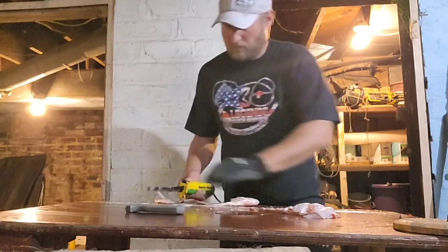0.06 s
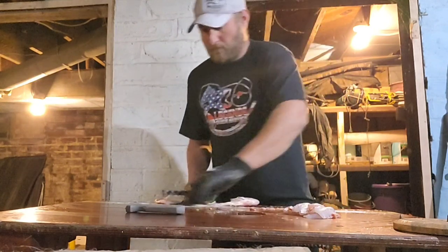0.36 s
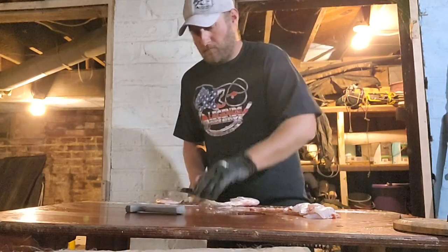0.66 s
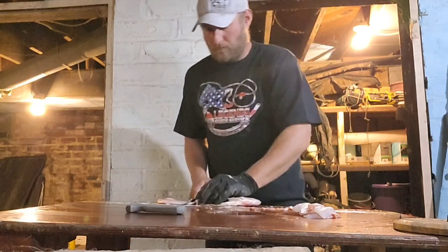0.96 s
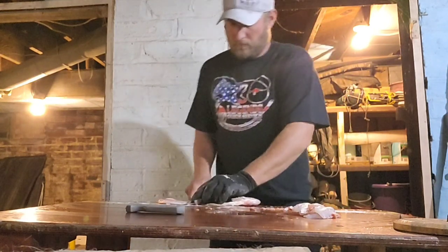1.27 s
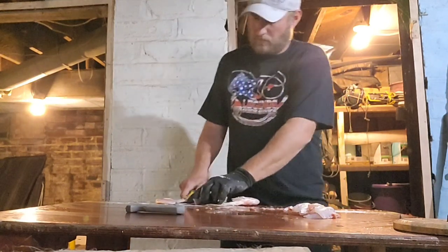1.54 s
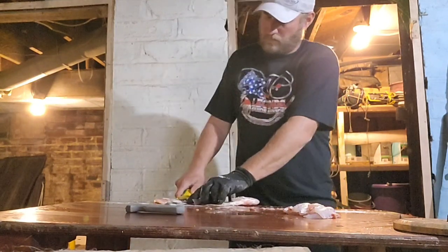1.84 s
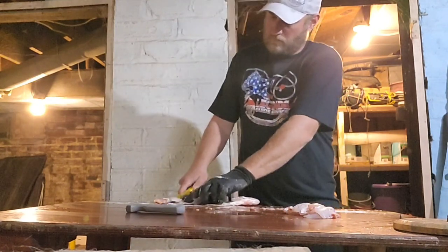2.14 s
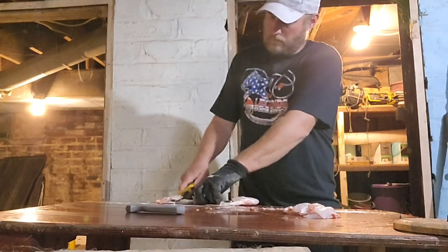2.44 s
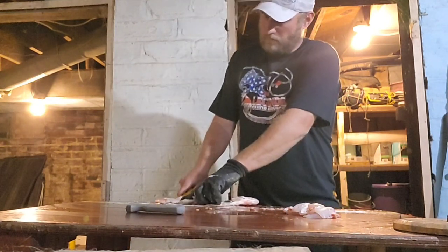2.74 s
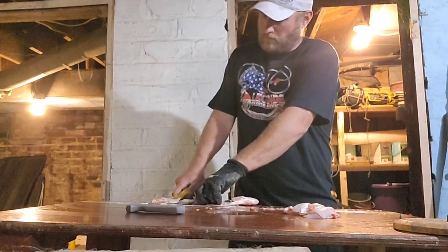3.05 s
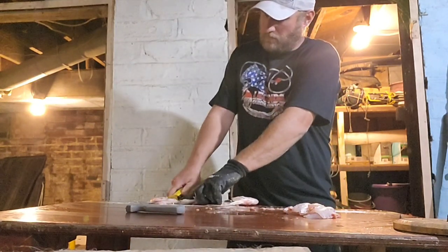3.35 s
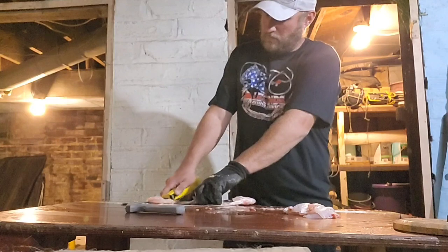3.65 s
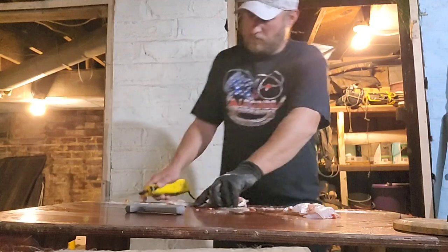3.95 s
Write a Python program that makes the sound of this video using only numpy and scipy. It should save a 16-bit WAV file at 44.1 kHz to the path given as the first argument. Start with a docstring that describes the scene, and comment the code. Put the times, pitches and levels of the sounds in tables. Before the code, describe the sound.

An electric knife winds down, clicks back on and buzzes as it cuts fish.

```python
"""An electric fillet knife coasts almost to a stop, with a few knocks, at a wooden table in a cellar.
After one second the trigger clicks, the geared motor whines up, and two blades saw through a fish.
As they slide to and fro the housing shakes, the blades clatter and ring, and brushes and fan hiss.
Near 2.7 s the motor nearly stalls in a tough spot, then recovers and cuts on.
All along, the brick walls add a short echo."""
import sys
import numpy as np
from scipy import signal
from scipy.fft import rfft, irfft
from scipy.io import wavfile
from scipy.ndimage import uniform_filter1d

SR = 44100
rng = np.random.default_rng(int(sys.argv[2]) if len(sys.argv) > 2 else 0)


def store_wav(level_fs):
    """Save 16-bit WAV to argv[1]."""
    pcm = np.round(np.clip(np.atleast_2d(level_fs), -1, 1) * 32767)
    wavfile.write(sys.argv[1], SR, pcm.T.astype(np.int16))


N = 176400  # 4 seconds

# How fast the motor drives the blades: time_s, strokes_per_s
SPEED = [(0, 17), (.3, 9), (.65, 1), (1.0, 1), (1.1, 10.5), (1.2, 15.6), (1.3, 19.8), (1.4, 21.8),
         (1.5, 23.1), (1.6, 23.75), (1.7, 23.87), (1.85, 23.5), (2.0, 23.07), (2.19, 22.7), (2.35, 24.05),
         (2.5, 20.1), (2.6, 17.9), (2.72, 13.7), (2.8, 18.5), (2.9, 20.6), (3.05, 21.9), (3.15, 22.2),
         (3.35, 22.03), (3.6, 22.3), (3.8, 22.9), (4, 24.6)]
# Loudness while coasting and starting: time_s, shake_db, clatter_db, motor_db
COASTING_LEVELS = [(0, -67, -41.5, -40), (.12, -54, -48, -43), (.27, -76, -59, -47.5),
                   (.42, -73, -61, -54.5), (.62, -75, -61.5, -60.5), (.68, -91, -77, -76),
                   (.76, -93, -93, -86), (.99, -92, -75, -68.5), (1.04, -70, -60, -60)]
# Loudness while cutting: time_s, shake_db, clatter_db, motor_db
CUTTING_LEVELS = [(1.08, -77.5, -38.5, -48.5), (1.17, -55, -38, -43.5), (1.28, -33.5, -33.5, -41),
                  (1.5, -28.5, -32.5, -37), (1.55, -26.5, -33, -37), (1.9, -32, -33.5, -37),
                  (2.23, -31.5, -35.5, -37), (2.33, -42, -33.5, -36), (2.45, -37.5, -35, -36.5),
                  (2.71, -57.5, -40.5, -43.5), (2.75, -53.5, -35.5, -41), (2.96, -31.5, -35.5, -37.5),
                  (3.86, -32, -34, -36.5), (4.0, -39.5, -34.5, -33.5)]
# How strongly the motor whines at each pitch: pitch_hz, level_db
WHINE_COLOUR = [(800, -38), (2020, -15), (2110, -8), (2220, -10), (2300, -3), (3000, -19), (4200, -11.5),
                (4400, -8.5), (5400, -10), (6400, -15), (7600, -24), (9600, -25), (10600, -14),
                (11400, -20), (12700, -23), (13700, -18.5), (14600, -28)]
# Loudness of the gears' thin ring: time_s, level_db
GEAR_LEVELS = [(1.3, -57), (1.48, -40), (1.88, -41), (2.1, -52), (2.33, -44), (2.5, -59), (4.0, -43.5)]
# The narrow band where the gears ring: pitch_hz, level_db
GEAR_COLOUR = [(2150, -50), (2375, 0), (2435, 0), (2620, -50)]

# How strongly the housing shakes at each pitch: pitch_hz, level_db
SHAKE_COLOUR = [(45, -40), (68, -18.5), (88, -29.5), (94, -16.5), (110, -28.5), (120, -21.5), (165, -58),
                (208, -32), (228, -19), (262, -6), (300, -12), (335, -13.5), (385, -5.5), (430, -12.5),
                (467, -9.5), (510, -20), (620, -16.5), (900, -45)]
# Boost or cut of the housing's deep boom: time_s, gain_db
BOOM_GAINS = [(1.3, -0.5), (1.6, -9.5), (1.8, 9), (2.0, 6), (2.27, 8.5), (2.5, -1.5), (3.1, 1.5),
              (3.8, 0.5)]
# The two points where the blades turn back: place_in_stroke (0 to 1), level_db
REVERSALS = [(.36, 0), (.73, -1.5)]
# Looseness of the blades: time_s, spread_cycles; then how fast they wander
SLACK, SLACK_HZ = [(1.3, .09), (2.3, .12), (3.0, .03)], 4

# Broad tone of the clatter: pitch_hz, level_db
CLATTER_COLOUR = [(60, -56.5), (160, -32.5), (260, -12.5), (500, -7.5), (1000, -9), (1500, -17.5),
                  (2400, -13.5), (3000, -19), (6000, -29.5), (9500, -30), (16000, -42)]
# Notes that blades and housing favour: pitch_hz, half_width_hz, level_db
CLATTER_PEAKS = [(200.2, 19.6, -7.5), (480, 27, -4.5), (622, 96, -4), (747, 29, 0), (1286, 324, -7.5),
                 (1965, 124, -7), (2410, 180, -7), (3740, 180, -16), (4360, 180, -17.5)]
# Loudness of the steel, ringing where it is free of the flesh: time_s, level_db
STEEL_LEVELS = [(0, -47), (.3, -54), (.6, -77), (.72, -88), (1.042, -87), (1.055, -50), (1.2, -52.5),
                (1.35, -45), (2.25, -53), (2.38, -38), (2.6, -37.5), (2.7, -60), (2.82, -51), (2.95, -55)]
# Broad tone of the free steel: pitch_hz, level_db
STEEL_COLOUR = [(100, -87), (400, -3), (1500, -35), (5000, -34.5), (16000, -52)]
# Notes of the free steel: pitch_hz, half_width_hz, level_db
STEEL_PEAKS = [(473, 29, -6), (840, 59, 2.5), (1316, 70, -11), (1473, 45, -2.5)]
# Loudness of the knife's hollow ring: time_s, level_db
HOLLOW_LEVELS = [(1.05, -62), (2.25, -44), (2.5, -39), (2.72, -52), (3.8, -44)]
# Note of the hollow ring: pitch_hz, half_width_hz, level_db
HOLLOW_PEAK = [(476.6, 16.7, 0)]
# Loudness of the blades' tinny rattle: time_s, level_db
RATTLE_LEVELS = [(1.05, -63), (1.1, -40), (1.5, -52), (2.36, -46), (2.6, -50), (3.74, -47), (3.81, -41),
                 (4.0, -45)]
# Note of the rattle: pitch_hz, half_width_hz, level_db
RATTLE_PEAK = [(1430, 90, 0)]
# Faint, even base under a single note: pitch_hz, level_db
FLAT_COLOUR = [(100, -60), (16000, -60)]
# Tone of the brush and fan hiss: pitch_hz, level_db
HISS_COLOUR = [(200, -22), (1000, -4.5), (2700, -3.5), (4200, 1), (5200, -3.5), (8000, -5), (9200, -12.5),
               (11000, -7), (16000, -8.5)]

# Single knocks of the blades: start_s, crack_db, ring_db
KNOCKS = [(.002, -28.5, -38), (.086, -30.5, -34), (.185, -32.5, -42), (.303, -36.5, -43),
          (.483, -46.5, -50), (1.051, -41, -33.5), (1.083, -27.5, -36), (1.154, -29, -47),
          (3.794, -33, -38.5)]
# Tone of a knock's crack: pitch_hz, level_db
CRACK_COLOUR = [(100, -36), (300, -17), (1200, -8.5), (5000, -15), (16000, -66)]
# Notes of the knocked blades: pitch_hz, level_db, decay_s
KNOCK_NOTES = [(461, -17.5, 0.014), (827, 1, 0.023), (1254, -14, 0.022), (1460, -5.5, 0.031)]
# Heavy jolts of the knife: start_s, level_db
JOLTS = [(0.025, -28.5), (1.262, -36), (1.578, -23), (1.627, -26)]
# Notes of the jolted housing: pitch_hz, level_db, decay_s
JOLT_NOTES = [(261, -8, 0.045), (358.6, -1, 0.015), (416, -4.5, 0.025), (619, -9.5, 0.04)]
# Dull bumps on the table: start_s, level_db
BUMPS = [(.04, -55), (.16, -57), (1.011, -48.5), (3.87, -41)]
# Tone of the wooden table: pitch_hz, level_db
WOOD_COLOUR = [(35, -25), (68, 9), (130, -2), (300, -40), (2000, -78)]
# Soft pats of the hand on the fish: start_s, level_db, decay_s
PATS = [(0.027, -39, 0.034), (0.847, -52.5, 0.016), (.88, -66.5, 0.099)]
# Tone of a pat: pitch_hz, level_db
FLESH_COLOUR = [(80, -43), (230, -5), (420, -1), (1400, -13.5), (3000, -38), (7000, -23), (16000, -17)]
# The trigger takes up its slack, then snaps: start_s, level_db
TRIGGER_CLICKS = [(0.988, -64), (1.002, -37)]
# Tone of the trigger: pitch_hz, level_db
TRIGGER_COLOUR = [(400, -15), (800, 15), (1200, -11), (3500, 10), (9000, -2.5), (16000, -18)]

# Strength of the echo that differs between left and right: pitch_hz, level_db
SIDE_COLOUR = [(300, -12), (1000, -2), (2800, -3), (14000, 1.5)]
# The cellar's faint rumble: pitch_hz, level_db; then its overall loudness
CELLAR_COLOUR, CELLAR_DB = [(200, 10), (1500, -26), (5000, -30), (16000, -11)], -77.5

FULL_SPEED, SPEED_JITTER, SPEED_JITTER_HZ = 22, .003, 70  # FULL_SPEED is in strokes per second
WHINE_PER_STROKE, GEAR_MULTIPLES = 96, (99, 102, 105, 108)  # cycles per stroke
WHINE_ROUGH, STRAIN_ROUGH, COASTING_WHINE_DB = .55, 1.5, -1
HISS_DB, HISS_FLICKER_DB, BRUSH_DEPTH, STROKE_DEPTH = -.62, .76, .078, .11
SHAKE_DB, EVERY_THIRD_DB, BOOM_HZ, BOOM_WIDTH_HZ = -5, 4, 255, 26
IMPACT_SPREAD_DB, IMPACT_SCATTER_DB, IMPACT_JITTER_S = .5, 1.5, .0003
CLATTER_DB, SCRAPE_DB, RATTLE_FLUTTER_DB = -.5, 5, 6
ATTACK_S, CONTACT_S = .0067, .0017  # rise times of noise bursts and of struck notes
ECHO_S, ECHO_DB, ECHO_DRIFT_HZ = .2, -6.5, 2.28  # the echo falls 60 dB in ECHO_S
FADE_DB, FADE_HZ = .8, 5  # tones swell and fade as the knife moves in the room


def knife(stroke):
    """The running knife. All its parts follow `stroke`, the count of blade strokes so far."""
    levels = list(COASTING_LEVELS) + list(CUTTING_LEVELS)
    shake_db, clatter_db, motor_db = (curve(levels, column) for column in (1, 2, 3))
    impacts = blade_impacts(stroke)
    clatter = unit(colour(impacts, CLATTER_COLOUR, CLATTER_PEAKS)) * undb(CLATTER_DB + clatter_db)
    ring = blade_ring(impacts) + gears(stroke)
    return housing(stroke) * undb(shake_db) + clatter + ring + motor(stroke) * undb(motor_db)


def housing(stroke):
    """The blades knock the housing each time they turn back, so it hums at multiples of their rate."""
    speed, boom_db, slack = curve(SPEED), curve(BOOM_GAINS), curve(SLACK)
    shake = 0
    for k in range(2, 28):
        near_boom = np.exp(-((k * speed - BOOM_HZ) / BOOM_WIDTH_HZ) ** 2)
        level_db = SHAKE_DB + EVERY_THIRD_DB * (k % 3 == 0) + boom_db * near_boom
        # The tones line up into knocks at the turning points; loose blades blur them.
        knocks = sum(undb(db) * np.exp(-2j * np.pi * k * place) for place, db in REVERSALS)
        cycles = k * stroke + np.angle(knocks) / (2 * np.pi) + slack * wander(SLACK_HZ)
        shake = shake + undb(level_db) * wavering_tone(cycles, SHAKE_COLOUR, wobble=.2, wobble_hz=14)
    return shake


def blade_impacts(stroke, count=16):
    """Small hits repeat with every stroke, never quite alike; steel scrapes between them."""
    places = (np.arange(count) + rng.random(count)) / count
    pattern_db = IMPACT_SPREAD_DB * rng.standard_normal(count)
    whole_strokes = np.arange(int(stroke[-1]) + 1)[:, None]
    jitter, scatter = rng.standard_normal((2, len(whole_strokes), count))
    at_sample = np.interp(whole_strokes + places, stroke, np.arange(N), right=2 * N)
    at_sample += SR * IMPACT_JITTER_S * jitter
    size = undb(pattern_db + IMPACT_SCATTER_DB * scatter) * rng.choice([-1, 1], count)
    inside = (at_sample >= 0) & (at_sample < N)
    hits = np.bincount(at_sample[inside].astype(int), size[inside], N)
    return unit(hits) + undb(SCRAPE_DB) * noise()


def blade_ring(impacts):
    """The hits make the steel ring; with the power on they add a hollow note and a tinny rattle."""
    steel = unit(colour(impacts, STEEL_COLOUR, STEEL_PEAKS)) * undb(curve(STEEL_LEVELS))
    hollow = unit(colour(impacts, FLAT_COLOUR, HOLLOW_PEAK)) * undb(curve(HOLLOW_LEVELS))
    flurries = undb(RATTLE_FLUTTER_DB * np.tanh(wander(hz=35)))
    rattle = unit(colour(impacts * flurries, FLAT_COLOUR, RATTLE_PEAK)) * undb(curve(RATTLE_LEVELS))
    return steel + (hollow + rattle) * power_on()


def motor(stroke):
    """Brushes and fan hiss in pulses, under a whine that gets weaker and rougher as the motor slows."""
    cycles = WHINE_PER_STROKE * stroke
    brush_pulse = 1 + BRUSH_DEPTH * np.cos(2 * np.pi * cycles)
    stroke_pulse = 1 + STROKE_DEPTH * np.cos(2 * np.pi * 2 * stroke)  # twice per stroke
    hiss_gain = undb(HISS_DB + HISS_FLICKER_DB * wander(hz=24))
    hiss = hiss_gain * unit(colour(brush_pulse * stroke_pulse * noise(), HISS_COLOUR))
    speed_share = curve(SPEED) / FULL_SPEED
    rough = WHINE_ROUGH + STRAIN_ROUGH * np.maximum(1 - speed_share, 0)
    whine = sum(wavering_tone(k * cycles, WHINE_COLOUR, wobble=rough * np.sqrt(k), wobble_hz=170)
                for k in range(1, 8))
    return hiss + whine * speed_share ** .7 * undb(COASTING_WHINE_DB * ~power_on())


def gears(stroke):
    """The gears' tones take turns passing through one narrow band: a piercing ring under load."""
    tones = sum(wavering_tone(k * stroke, GEAR_COLOUR, wobble=.6, wobble_hz=60) for k in GEAR_MULTIPLES)
    return tones * undb(curve(GEAR_LEVELS))


def handling():
    """Blades knock, the housing jolts, the table is bumped, the fish is patted, the trigger clicks."""
    cracks = sum(burst(s, db, decay_s=.013) for s, db, _ in KNOCKS) * coloured_noise(CRACK_COLOUR)
    clacks = sum(struck(s, db, KNOCK_NOTES) for s, _, db in KNOCKS)
    jolts = sum(struck(s, db, JOLT_NOTES) for s, db in JOLTS)
    bumps = sum(burst(s, db, decay_s=.092) for s, db in BUMPS) * coloured_noise(WOOD_COLOUR)
    pats = sum(burst(*pat) for pat in PATS) * coloured_noise(FLESH_COLOUR)
    clicks = sum(burst(s, db, decay_s=.015) for s, db in TRIGGER_CLICKS) * coloured_noise(TRIGGER_COLOUR)
    return cracks + clacks + jolts + bumps + pats + clicks


def wall_echo(sound):
    """Short echoes off the walls; those from the sides differ left and right, and slowly shift."""
    t = np.arange(N) / SR
    tails = rng.standard_normal((3, N)) * undb(-60 * t / ECHO_S) * (t > .002)
    front, side_a, side_b = (signal.fftconvolve(sound, tail / np.linalg.norm(tail))[:N] for tail in tails)
    shift = 2 * wander(ECHO_DRIFT_HZ)  # the knife moves about
    middle = (sound + undb(ECHO_DB) * front) / np.hypot(1, undb(ECHO_DB))
    side = colour(side_a * np.cos(shift) + side_b * np.sin(shift), SIDE_COLOUR)
    return np.array([middle + side, middle - side])


def cellar_rumble():
    """A faint, steady, low noise fills the room."""
    return undb(CELLAR_DB) * coloured_noise(CELLAR_COLOUR)


def power_on():
    """True from the moment the trigger snaps shut."""
    return np.arange(N) / SR >= TRIGGER_CLICKS[-1][0]


def wavering_tone(cycles, strengths, wobble, wobble_hz):
    """An unsteady tone that grows and fades as its pitch slides along a table of strengths."""
    pitch_hz = np.maximum(np.gradient(cycles) * SR, 1)
    table_hz, table_db = np.array(strengths).T
    sway = (1 + wobble * (wander(wobble_hz) + 1j * wander(wobble_hz))) / np.sqrt(1 + 2 * wobble ** 2)
    fade = undb(FADE_DB * wander(FADE_HZ))
    tone = unit(np.real(sway * fade * np.exp(2j * np.pi * cycles)))
    return tone * undb(np.interp(np.log(pitch_hz), np.log(table_hz), table_db))


def struck(start_s, level_db, notes):
    """One blow: all notes start at once and each dies away at its own rate."""
    age = np.maximum(np.arange(N) / SR - start_s, 0)
    ring = sum(undb(db) * np.exp(-age / decay_s) * np.sin(2 * np.pi * (hz * age + rng.random()))
               for hz, db, decay_s in notes)
    return undb(level_db) * (1 - np.exp(-age / CONTACT_S)) * ring


def burst(start_s, level_db, decay_s):
    """A loudness shape that rises quickly and dies away."""
    age = np.maximum(np.arange(N) / SR - start_s, 0)
    return undb(level_db) * (1 - np.exp(-age / ATTACK_S)) * np.exp(-age / decay_s)


def colour(sound, broad_tone, peaks=()):
    """Filter a sound with a broad tone shape plus narrow, ringing peaks."""
    hz = np.fft.rfftfreq(2 * N, 1 / SR)
    table_hz, table_db = np.array(broad_tone).T
    power = undb(np.interp(np.log(hz + 1), np.log(table_hz), table_db)) ** 2
    for pitch_hz, half_width_hz, db in peaks:
        power = power + (undb(db) / (1 + ((hz - pitch_hz) / half_width_hz) ** 2)) ** 2
    # Make the filter ring only after each hit, never before it.
    cepstrum = irfft(np.log(power) / 2)
    cepstrum[1:N] *= 2
    cepstrum[N + 1:] = 0
    return irfft(rfft(sound, 2 * N) * np.exp(rfft(cepstrum)))[:N]


def coloured_noise(broad_tone):
    """Noise with the given tone, at strength 1."""
    return unit(colour(noise(), broad_tone))


def curve(rows, column=1):
    """Join the points of a timed table with straight lines."""
    rows = np.array(rows)
    return np.interp(np.arange(N) / SR, rows[:, 0], rows[:, column])


def wander(hz):
    """Smooth random motion of strength 1; more hz makes it quicker."""
    span = max(int(SR / hz), 2)
    smoothed = uniform_filter1d(noise(), span, mode="wrap")
    return unit(uniform_filter1d(smoothed, span, mode="wrap"))


def noise():
    """White noise: an even hiss."""
    return rng.standard_normal(N)


def unit(x):
    """Scale to an average strength (rms) of 1."""
    return x / np.sqrt(np.mean(x ** 2))


def undb(db):
    """Turn decibels into a multiplier."""
    return 10 ** (np.asarray(db) / 20)


def scene():
    """Knife, handling and rumble all echo in the cellar, in stereo."""
    speed = curve(SPEED) * (1 + SPEED_JITTER * wander(SPEED_JITTER_HZ))
    stroke = np.cumsum(speed) / SR
    return wall_echo(knife(stroke) + handling() + cellar_rumble())


def record(dry):
    """Cut away the highest treble, above 15850 Hz."""
    return signal.sosfilt(signal.ellip(12, .1, 85, 15850, fs=SR, output="sos"), dry)


dry = scene()
out = record(dry)
store_wav(out)
```